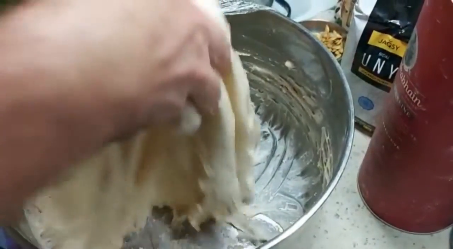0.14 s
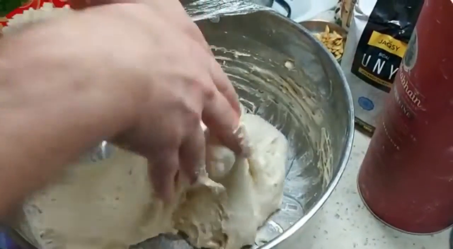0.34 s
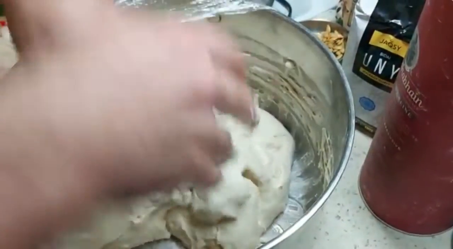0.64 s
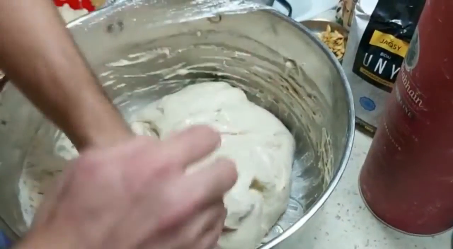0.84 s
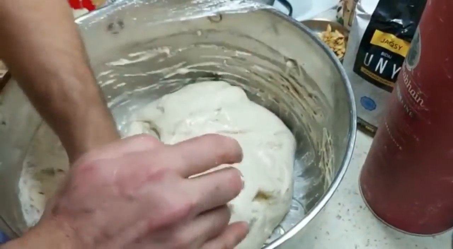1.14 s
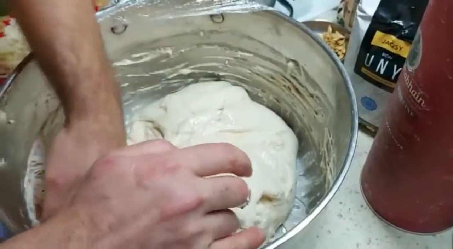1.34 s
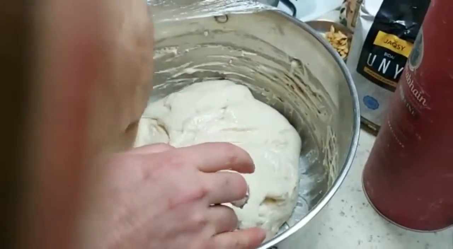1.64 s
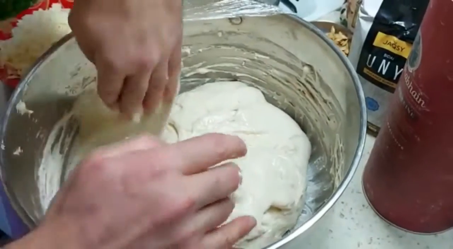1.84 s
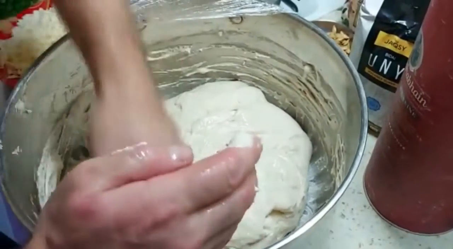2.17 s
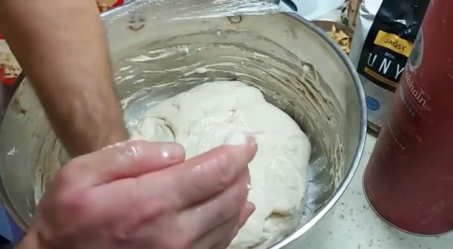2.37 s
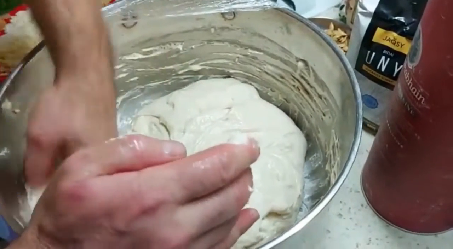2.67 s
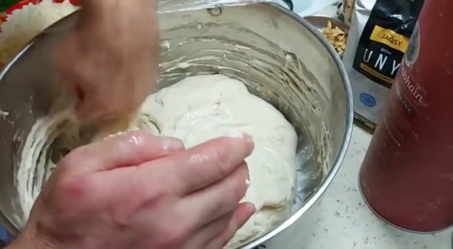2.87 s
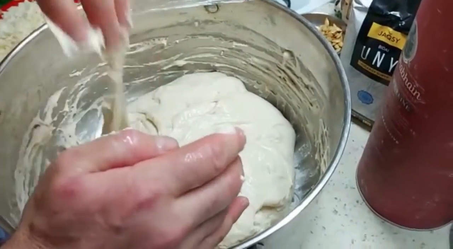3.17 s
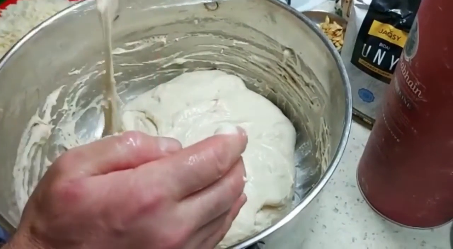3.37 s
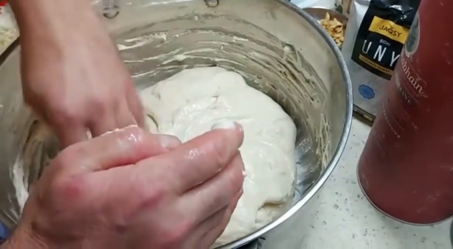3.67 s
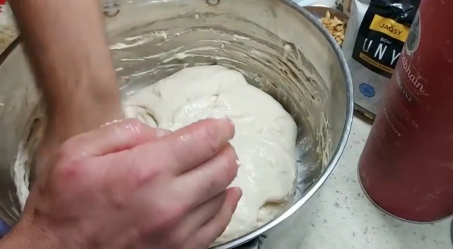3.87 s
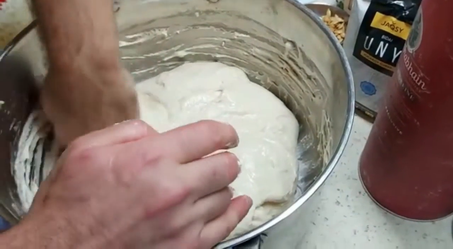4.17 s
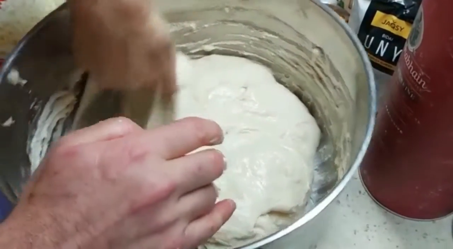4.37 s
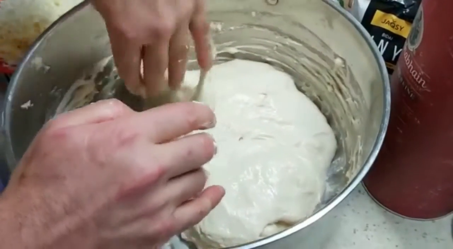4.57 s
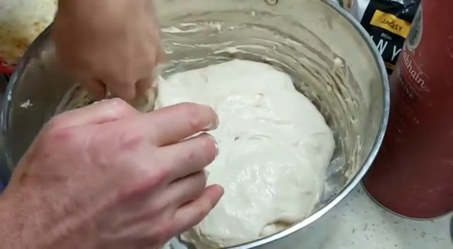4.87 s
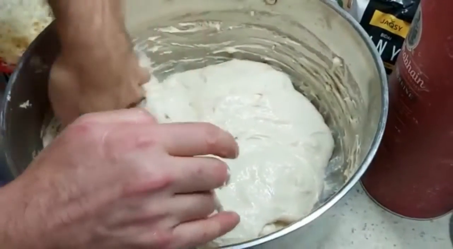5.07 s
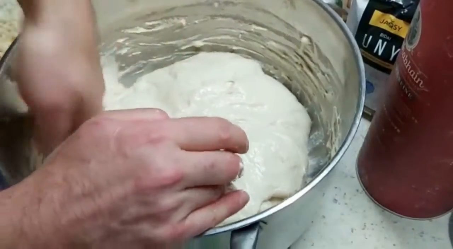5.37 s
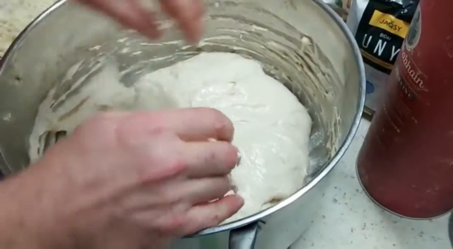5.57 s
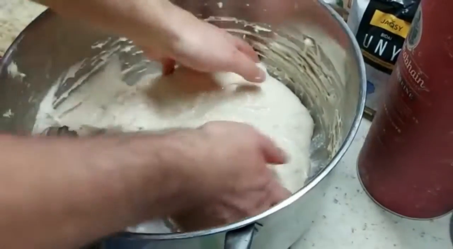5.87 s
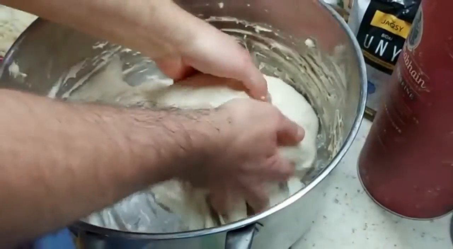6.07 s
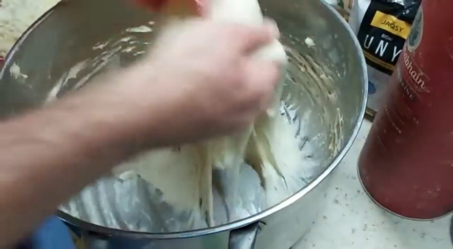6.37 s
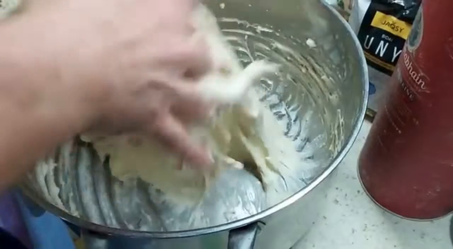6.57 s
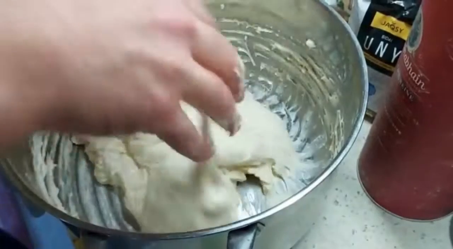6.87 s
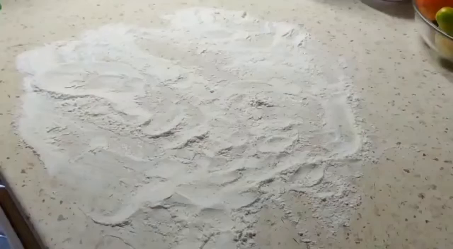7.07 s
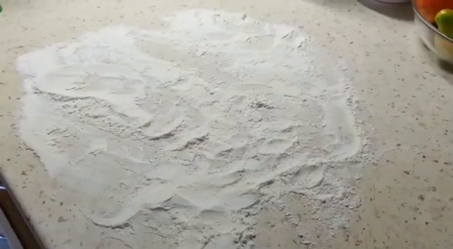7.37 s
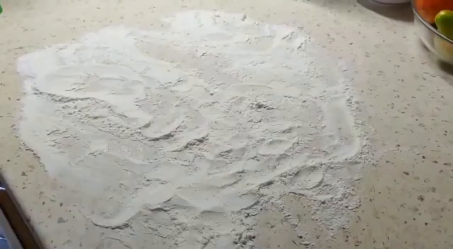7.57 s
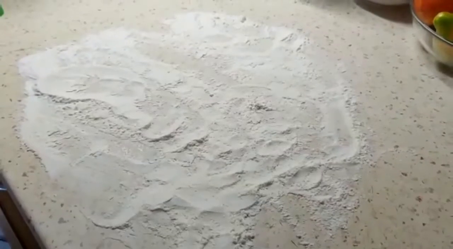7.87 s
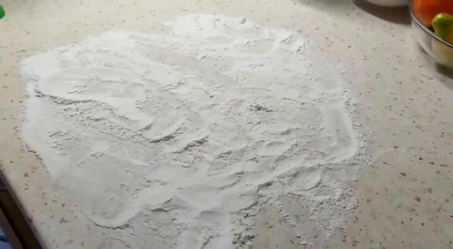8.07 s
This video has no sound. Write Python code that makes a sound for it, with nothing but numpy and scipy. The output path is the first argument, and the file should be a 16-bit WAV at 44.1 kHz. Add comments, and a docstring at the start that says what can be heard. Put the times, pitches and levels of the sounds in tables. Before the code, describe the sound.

Hands work sticky dough in a steel pot, heard very close in a quiet kitchen. Dough peels with fine bright crackles and tiny snaps; a heavy wet slap thumps the pot early and a harder one comes midway. Soft wipes and faint squeaks fill the gaps. A busier run of squelches and dull knocks follows, then only low room hum and a soft bump with a light tap.

```python
"""Hands knead wet, sticky dough in a steel pot on a kitchen counter, close to a phone's two microphone ports.
Noise-driven modes make the dough thump the damped pot; shaped grains smack, squelch, snap and wipe its wall.
Each pull builds up a crackle and lets it go; each wipe swells and fades with the speed of the hand.
Trapped air squeaks as gliding tones and the pressed pot judders low, over rumble and appliance hum.
Near the end the background moves to the counter, where some hums are louder and something bumps softly."""
import sys
import numpy as np
from scipy import signal
from scipy.fft import rfft, irfft
from scipy.io import wavfile
from scipy.ndimage import uniform_filter1d

SR = 44100
rng = np.random.default_rng(int(sys.argv[2]) if len(sys.argv) > 2 else 0)


def master(y):
    """Save y as 16-bit WAV."""
    cut = np.clip(np.atleast_2d(y).T, -1, 1)
    pcm = np.round(cut * 32767)  # scale
    wavfile.write(sys.argv[1], SR, pcm.astype(np.int16))


N = 362502
T = np.arange(N) / SR  # s
HIT_T = T[:SR * 3 // 5]  # s, the span of one hit
MOVE_S = 7.13  # the background passes from pot to counter
TOP_HZ = 15850  # top of the microphone's range
SNAP_T60_S = 0.0057
PULL_RANGE_DB = 20  # climb of the crackle over the build-up, and its fall over the let-go
PORT_LAG_S = 0.0002  # the pot's own ring reaches the left port this much later
BUMP_LAG_S, BUMP_LEFT_DB = 0.00027, -7  # the bump's touch is later at the right port, weaker at the left

# Levels in the event tables are relative: each layer is trimmed again in the mix.
# Pulls that peel dough off skin and steel: (greatest strain t/s, level/dB, build-up/s, let-go/s)
PULLS = [(0.02, -67.5, 0.25, 0.52), (0.36, -59, 0.32, 0.52), (0.68, -53, 0.053, 0.045),
         (1.28, -59.5, 0.58, 0.71), (1.58, -58, 0.091, 0.16), (1.85, -64.5, 0.6, 0.34),
         (2.52, -66.5, 0.69, 0.28), (2.77, -58, .12, 0.43), (3.74, -61.5, 0.15, 0.06),
         (4.08, -67, 0.77, 0.73), (4.34, -58, 0.3, 0.58), (4.59, -53, 0.079, 0.12), (5.29, -63, 0.33, 0.37),
         (5.689, -60.5, 0.059, 0.076), (5.9, -57.5, 0.2, 0.23), (6.14, -51.5, 0.33, .36),
         (6.4, -56, 0.22, 0.33), (6.56, -60, 0.19, 0.087), (6.742, -58, 0.27, 0.27)]
# Loudest strands snapping and sticky ticks: (t/s, level/dB, f/Hz)
SNAPS = [(0.0953, -55.5, 13500), (0.301, -52, 13600), (0.365, -54.5, 13900), (0.499, -54.5, 13800),
         (1.2501, -50.5, 14000), (1.8213, -60, 13500), (1.975, -58.5, 13500), (2.524, -61, 13500),
         (2.7707, -57, 4370), (2.9543, -65, 14200), (3.166, -61, 13500), (3.982, -50, 14600),
         (4.25, -53, 7850), (4.2922, -50, 13400), (4.374, -54.5, 11100), (5.0212, -65.5, 4600),
         (5.2026, -59, 14000), (5.252, -60, 10500), (5.9735, -59, 13000), (6.001, -51, 12900),
         (6.2233, -49, 14400), (6.5505, -52.5, 7000), (6.7403, -56, 12400), (6.967, -50.5, 14000)]
# Air pockets squeezed out of the dough:
# (t/s, burst level/dB, hollow level/dB, spray level/dB, swell time constant/s, pocket f/Hz)
SQUELCHES = [(0.3022, -65, -58.5, -67, 0.0094, 1100), (0.6804, -50, -46, -61, 0.0059, 1110),
             (3.7424, -47.5, -47.5, -51.5, 0.0059, 714), (5.203, -68, -62.5, -77, 0.0096, 750),
             (5.8656, -47.5, -49.5, -74, 0.004, 4070), (6.2612, -63, -43, -63, 0.0034, 605),
             (6.3465, -59.5, -68, -71, 0.0057, 2880), (6.4467, -58.5, -49, -62.5, 0.0029, 566),
             (6.6912, -80, -49.5, -73, 0.009, 1065), (6.7501, -54, -53, -57.5, 0.02, 1730),
             (6.98, -61.5, -64, -73, 0.005, 2030), (7.0333, -69, -64.5, -72, 0.008, 1970)]
# Dough and hands landing in the pot:
# (t/s, thump level/dB, pot wall level/dB, wet smack level/dB, ring length factor)
SLAPS = [(0.321, -42, -55.5, -84, 0.52), (0.681, -37.5, -59, -79, 0.69), (0.757, -46, -69, -85, 0.56),
         (0.983, -19, -23, -31.5, 0.57), (2.414, -45.5, -59.5, -68, 0.82), (3.978, -29, -45, -67, 0.46),
         (4.574, -16.5, -18, -25, 0.49), (4.602, -23, -27, -42, 0.45), (4.645, -24.5, -51, -71, 0.39),
         (5.688, -33.5, -46, -52, 0.62), (5.708, -25.5, -38, -55.5, 0.75),
         (6.029, -24.5, -27.5, -41.5, 0.38), (6.087, -41, -50, -51.5, 0.78),
         (6.251, -33.5, -43.5, -55, 0.78), (6.304, -35.5, -45.5, -60.5, 0.97)]
# The pot judders as the fist leans into it: (t/s, length/s, f/Hz, level/dB)
JUDDERS = [(0.338, 0.2, 85.3, -54), (1.098, 0.098, 109, -46.5), (4.044, 0.19, 113.2, -47.5),
           (5.79, 0.23, 98.6, -51), (6.29, 0.084, 167, -55)]
# Fingers wiping along the pot wall: (fastest slide t/s, level/dB, half length/s)
WIPES = [(1.244, -67, 0.094), (1.37, -65, 0.038), (1.46, -64, 0.035), (1.61, -63.5, 0.099),
         (1.773, -74, 0.18), (2.695, -62, 0.18), (4.079, -69, 0.032), (4.222, -70.5, 0.17),
         (5.313, -68.5, .11), (6.062, -63.5, .09), (6.285, -80, .17)]
# Thin squeaks of air escaping from the dough:
# (t/s, length/s, f/Hz at the top of the arch, droop at the ends 0-1, level/dB)
SQUEAKS = [(3.782, .15, 12000, .12, -86), (3.79, 0.14, 9250, 0.2, -85), (3.901, 0.06, 8700, 0.15, -76.5),
           (4.011, 0.11, 8060, 0.1, -75), (6.96, 0.043, 4000, .1, -72)]
# Loaded pot rocking on the counter: (f/Hz, level/dB, t60/s before the slap's ring length factor)
ROCKING_MODES = [(91.7, -11, 0.99), (101.5, -2, 0.73), (152.4, 15, 0.25), (167.2, -8.5, 1),
                 (231.5, -4.5, 0.5)]
# Dough-damped pot wall: (f/Hz, level/dB, t60/s before the slap's ring length factor)
WALL_MODES = [(296, -57, 0.13), (314.7, -3, 0.47), (350, 8, 0.1), (432, 7, 0.11), (441.3, -22.5, 0.18),
              (588, -2, 0.23), (621, -8.5, 0.1)]
# Air inside the pot: (f/Hz, width/Hz, level/dB)
POT_AIR = [(473, 73, 2), (546, 20, -12), (737.4, 11, 13), (1009, 67, -7), (1550, 430, -12), (1884, 98, -4)]
# Colour of the wet smack of the hardest slap: (f/Hz, level/dB)
SMACK_COLOUR = [(100, 10), (300, -0.5), (600, -2.5), (900, -0.5), (1300, -2), (1600, 0), (2100, 0.5),
                (2800, -3.5), (3500, -6.5), (4600, -14), (5800, -20.5), (9000, -52.5), (15000, -68)]
# Colour of a bursting air pocket: (f/Hz, level/dB)
SQUELCH_COLOUR = [(500, 6), (1300, -8), (2200, 11.5), (3200, 2), (4600, 5), (6000, -4.5), (9000, -11.5),
                  (15000, -7)]
# Colour of parting dough threads: (f/Hz, level/dB)
CRACKLE_COLOUR = [(500, -21), (1500, -8), (3500, -15.5), (6000, -4.5), (9500, -8.5), (11500, -4.5),
                  (12800, 3.5), (15500, 2.5)]
# Colour of wet skin on steel: (f/Hz, level/dB)
WIPE_COLOUR = [(250, -17), (450, -2), (700, -13.5), (1050, 2.5), (1300, -11), (1750, -2), (2250, 4),
               (2700, -2), (3600, -1.5), (4900, -1.5), (6500, -13), (11000, -11)]
# Colour of the room at the pot: (f/Hz, level/dB)
POT_ROOM_COLOUR = [(20, -30), (35, -20.5), (50, -1.5), (70, -10.5), (105, -8.5), (125, 1), (160, -10.5),
                   (205, -11.5), (330, -14.5), (600, -18), (800, -25), (2200, -26), (9000, -41.5),
                   (15000, -48)]
# Colour of the room at the counter: (f/Hz, level/dB)
COUNTER_ROOM_COLOUR = [(20, -7), (40, -4.5), (52, 2.5), (75, -15.5), (130, -13.5), (195, -8.5), (260, -13),
                       (340, -18), (520, -27.5), (1000, -29.5), (2000, -31.5), (6000, -39.5),
                       (10000, -42.5), (15000, -41)]
# Steady appliance tones: (f/Hz, level/dB at the pot, level/dB at the counter)
HUM = [(45.6, -63.5, -56.5), (157.4, -67, -69.5), (176.5, -73.5, -83), (235, -72.5, -81), (302, -75, -65.5),
       (722, -84, -85.5)]
# Narrow bands of appliance hiss:
# (f/Hz, width/Hz of one filter pass, level/dB at the pot, level/dB at the counter)
WHINE = [(1732, 140, -83.5, -84), (1891, 115, -77.5, -90), (2477, 84, -92, -81.5), (2847, 66, -83, -89),
         (4120, 710, -82.5, -89.5), (5680, 280, -104, -87.5), (7180, 1200, -87, -86)]
# Shading of the left port by the phone's body: (f/Hz, level/dB)
LEFT_SHADE = [(100, -1.5), (300, 0.8), (600, -1.5), (1200, -6.5), (4000, -5.5), (8000, -4.5), (13000, -9)]


def undb(db):
    """Decibels to gain."""
    return 10 ** (np.asarray(db) / 20)


def unit(x):
    """Scale to rms 1."""
    return x / np.sqrt(np.mean(x ** 2))


def crest(x, size=220):
    """Scale so that the loudest run of size samples has rms 1."""
    return x / np.sqrt(uniform_filter1d(x ** 2, size).max())


def colour(x, points):
    """Causal filter with the (f/Hz, level/dB) response, built from its cepstrum."""
    hz, db = np.transpose(points)
    size = 4096
    bins = np.maximum(np.fft.rfftfreq(size, 1 / SR), 1)
    response_db = np.interp(np.log(bins), np.log(hz), db)
    cepstrum = irfft(np.log(undb(response_db)))
    # folding the cepstrum forward gives minimum phase
    cepstrum[1:size // 2] *= 2
    cepstrum[size // 2 + 1:] = 0
    impulse = irfft(np.exp(rfft(cepstrum)))
    return signal.oaconvolve(x, impulse)[:len(x)]


def band(x, hz, width):
    """One resonance, gain 1 at its centre."""
    hz = min(hz, TOP_HZ)
    b, a = signal.iirpeak(hz, hz / min(width, TOP_HZ), fs=SR)
    return signal.lfilter(b, a, x)


def double_band(x, hz, width):
    """The same resonance passed twice, for steeper skirts."""
    return band(band(x, hz, width), hz, width)


def fade(t, t60):
    """Exponential decay, 60 dB down after t60."""
    return np.exp(-np.log(1000) * t / t60)


def grains(count, spread_db):
    """Dense clicks of very unequal size, rms 1."""
    sizes = undb(spread_db * rng.standard_normal(count))
    return unit(rng.standard_normal(count) * sizes)


def walk(rate):
    """Random drift with a spread near 1, through rate new values a second."""
    knots = rng.standard_normal(4096)
    return np.interp(T * rate, np.arange(len(knots)), knots)


def add(track, s, sound):
    """Mix a sound in from time s."""
    start = int(np.clip(s * SR, 0, N - 1))
    track[start:start + len(sound)] += sound[:N - start]


def later(x, s):
    """Delay by s seconds."""
    out = np.zeros(N)
    add(out, s, x)
    return out


def space(x, wet_db):
    """Direct sound, quick reflections inside the pot and a short kitchen tail, different at each port."""
    pot_t60, low_t60, high_t60, room_db = 0.014, 0.22, 0.19, -14  # s, s, s, dB
    split_hz, shortest_hz = 1500, 450
    t, ports = HIT_T, []
    for noise in rng.standard_normal((2, len(t))):
        low = signal.lfilter(*signal.butter(1, split_hz, fs=SR), noise)
        room = low * fade(t, low_t60) + (noise - low) * fade(t, high_t60)
        echo = noise * fade(t, pot_t60) + undb(room_db) * room
        echo = echo * (t > 0.0007)  # gap before the first reflection, s
        # long waves bend round the pot
        echo = signal.lfilter(*signal.butter(2, shortest_hz, "high", fs=SR), echo)
        reflected = signal.oaconvolve(x, echo / np.linalg.norm(echo))[:N]
        ports.append(x + undb(wet_db) * reflected)
    return np.array(ports) / np.sqrt(1 + undb(2 * wet_db))


def arch(length, hz, droop, wobble):
    """A brief unsteady tone that swells, peaks in pitch and dies away."""
    u = np.linspace(-1, 1, int(max(length, 0.01) * SR))
    pitch = hz * (1 - droop * u ** 2 + wobble * walk(rate=104.0)[:len(u)])
    tone = np.sin(2 * np.pi * np.cumsum(pitch) / SR)
    return np.sqrt(2) * (1 - u ** 2) * tone


def shifting(x, depth_db, rate, count=14):
    """Small wet cavities open and close, each lifting its own pitch for a moment."""
    total = 0
    for hz in np.geomspace(400, 9000, count):
        cavity = double_band(x, hz, hz / 4)
        total = total + np.sqrt(1000 / hz) * cavity * undb(depth_db * walk(rate))
    return unit(total)


def pot_air(x):
    """The air inside the pot resonates at its own pitches."""
    return sum(undb(db) * band(x, hz, width) for hz, width, db in POT_AIR)


def background():
    """Room rumble and a running appliance, heard first from the pot and then from the counter."""
    pot_db, counter_db, left_db = -62, -59, -4
    apart_hz = 900
    moved = np.clip((T - MOVE_S) / 0.02, 0, 1)
    common, left, right = rng.standard_normal((3, N))
    low = signal.butter(2, apart_hz, "low", fs=SR)
    high = signal.butter(2, apart_hz, "high", fs=SR)
    hum = 0
    for hz, at_pot, at_counter in HUM:
        level = np.sqrt(2) * undb(at_pot + (at_counter - at_pot) * moved)
        waver = 1 + 0.092 * walk(rate=7.9)
        phase = 2 * np.pi * hz * T + 0.5 * walk(rate=8.4)
        hum = hum + level * waver * np.sin(phase)
    ports = []
    for own in (undb(left_db) * left, right):
        # long waves reach both ports nearly alike
        air = signal.lfilter(*low, common + 0.69 * own) + signal.lfilter(*high, own)
        pot_room = undb(pot_db) * (1 - moved) * unit(colour(air, POT_ROOM_COLOUR))
        counter_room = undb(counter_db) * moved * unit(colour(air, COUNTER_ROOM_COLOUR))
        whine = 0
        for hz, width, at_pot, at_counter in WHINE:
            level_db = at_pot + (at_counter - at_pot) * moved + 2 * walk(rate=7.4)
            whine = whine + undb(level_db) * unit(double_band(own, hz, width))
        # the hiss is weaker at the left port
        ports.append(hum + pot_room + counter_room + whine * own.std())
    return np.array(ports)


def pull(s, db, build, release):
    """Crackle grows with the strain on the dough and dies away once it gives."""
    before = (s - T) / max(build, 0.01)
    after = (T - s) / max(release, 0.01)
    return undb(db - PULL_RANGE_DB * np.maximum(before, after))


def peeling():
    """Countless tiny threads let go in flurries, and some pop in wet hollows."""
    peel_db, pops_db = -1.25, -12.0
    clicks = grains(N, spread_db=8) * undb(4.5 * walk(rate=130))
    pops = shifting(grains(N, spread_db=11), depth_db=4, rate=45)
    strain = np.sqrt(sum(pull(*row) ** 2 for row in PULLS))
    crackle = unit(colour(clicks, CRACKLE_COLOUR)) + undb(pops_db) * pops
    return undb(peel_db) * strain * crackle


def snaps():
    """A strand parts with a sharp tick around its own pitch, and its ends patter back."""
    snap_db, click_db = 4, -14
    tail_db, tail_t60 = -24, 0.14  # dB, s
    breadth = 0.49  # band width as a share of the pitch
    out, t = np.zeros(N), T[:SR // 8]
    for s, level, hz in SNAPS:
        shape = fade(t, SNAP_T60_S) + undb(tail_db) * fade(t, tail_t60)
        tick = grains(len(t), spread_db=4) * shape
        pitched = double_band(tick, hz, breadth * hz)
        add(out, s, undb(level + snap_db) * crest(pitched + undb(click_db) * tick, size=64))
    return out


def squelches():
    """A pocket swells open, bursts in a fine spray, and sounds its own hollow and the air in the pot."""
    burst_db, hollow_db, spray_db, swell_db, pocket_db = -2, -3, -2, -5, 2
    close_t60 = 0.043  # s
    pocket_breadth = 0.083  # band width as a share of the pocket's pitch
    spray_hz, spray_width_hz = 7800, 10000
    out, t = np.zeros(N), HIT_T - 0.06  # the burst is at t = 0
    for s, burst_level, hollow_level, spray_level, swell, pocket in SQUELCHES:
        opening = undb(swell_db) * np.exp(-abs(t) / max(swell, 0.001))
        shape = np.where(t < 0, opening, fade(abs(t), close_t60))
        puff = shape * grains(len(t), spread_db=6)
        pot = colour(pot_air(puff), [(150, -19), (450, 6.5), (1800, 6), (5000, -9.5)])
        own_hollow = band(puff, pocket, pocket_breadth * pocket)
        hollow = crest(pot) + undb(pocket_db) * crest(own_hollow)
        mist = double_band(puff, spray_hz, spray_width_hz)
        sound = undb(burst_level + burst_db) * crest(colour(puff, SQUELCH_COLOUR))
        sound += undb(hollow_level + hollow_db) * crest(hollow)
        sound += undb(spray_level + spray_db) * crest(mist)
        add(out, s + t[0], sound)
    return out


def ring(force, modes, hold, detune):
    """Modes driven by a force; the dough lies differently each time, shifting and damping them."""
    response = 0
    for hz, db, t60 in modes:
        shifted_hz = hz * (1 + detune * rng.standard_normal())
        tone = np.cos(2 * np.pi * shifted_hz * HIT_T)
        response = response + undb(db) * fade(HIT_T, t60 * hold) * tone
    return crest(signal.fftconvolve(force, response)[:len(HIT_T)])


def slaps():
    """Air rushes from the closing gap, the wet face smacks, the settling lump shakes the pot: body, wet."""
    wall_db, smack_db = 1, 1
    settle, settle_t60 = 0.021, 0.27  # share of the impact, s
    rush_db, rush_s = -16, 0.0097  # dB, time constant in s
    smack_t60, patter_db, patter_t60 = 0.023, -13.0, 0.21  # s, dB, s
    crack_db, crack_hz, crack_width_hz = -20, 5200, 6500
    db_per_octave = 75  # softer slaps shift their colour down
    body, wet, t = np.zeros(N), np.zeros(N), HIT_T
    lead = T[:SR // 25]
    hardest = max(row[3] for row in SLAPS)
    for s, thump, wall, smack, hold in SLAPS:
        force = settle * rng.standard_normal(len(t)) * fade(t, settle_t60)
        force[0] += 1
        # the soft mass lands slowly and drives only the low modes
        push = colour(force, [(25, -26.5), (75, 7.5), (200, -1.5), (600, -13), (2000, -50)])
        shake = colour(force, [(60, -30.0), (280, 5), (700, 2), (1500, -28), (5000, -83)])
        rocking = undb(thump) * ring(push, ROCKING_MODES, hold, detune=0.023)
        walls = undb(wall + wall_db) * ring(shake, WALL_MODES, hold, detune=0.026)
        add(body, s, rocking + walls)
        rush = undb(rush_db) * np.exp(-lead[::-1] / rush_s)
        landing = fade(t, smack_t60) + undb(patter_db) * fade(t, patter_t60)
        shape = np.r_[rush, landing]
        spatter = shape * grains(len(shape), spread_db=4)
        # softer slaps are darker and lose their crack
        softer = smack - hardest
        darker = [(hz * 2 ** (softer / db_per_octave), db) for hz, db in SMACK_COLOUR]
        splat = crest(colour(spatter, darker))
        crack = crest(double_band(spatter, crack_hz, crack_width_hz))
        face = splat + undb(crack_db + 2 * softer) * crack
        add(wet, s - lead[-1], undb(smack + smack_db) * face)
    return body, wet


def judders():
    """The pressed pot sticks and slips on the counter with a low groan of wobbling pitch."""
    out = np.zeros(N)
    for s, length, hz, db in JUDDERS:
        add(out, s, undb(db) * arch(length, hz, droop=0.0054, wobble=0.23))
    return out


def stroke(s, db, half):
    """A hand speeds up and slows again: a bell-shaped swell."""
    return undb(db) * np.exp(-((T - s) / max(half, 0.005)) ** 2)


def wiping():
    """Wet skin slides over smeared steel in fine slips, gripping unevenly; once it nearly squeaks."""
    grip_db, hollow_db, shifting_db = 3, -5, -5
    squeak_s, squeak_half_s, squeak_hz, squeak_db = 2.70, 0.017, 2250, -55
    slips = grains(N, spread_db=7.5) * undb(grip_db * walk(rate=97))
    pockets = shifting(grains(N, spread_db=7), depth_db=3, rate=40)
    rub = unit(colour(slips, WIPE_COLOUR))
    rub += undb(hollow_db) * unit(pot_air(slips))
    rub += undb(shifting_db) * unit(colour(pockets, WIPE_COLOUR))
    squeak_swell = 1 / (1 + ((T - squeak_s) / squeak_half_s) ** 2)
    squeak = unit(double_band(slips, squeak_hz, 220)) * squeak_swell
    slide = np.sqrt(sum(stroke(*row) ** 2 for row in WIPES))
    return rub * slide + undb(squeak_db) * squeak


def squeaks():
    """Trapped air whistles out through pinholes in the wet dough."""
    out = np.zeros(N)
    for s, length, hz, droop, db in SQUEAKS:
        add(out, s, undb(db) * arch(length, hz, droop, wobble=0.004))
    return out


def bump():
    """Something brushes the counter, bumps it softly and lands with a light tap; left and right port."""
    brush_s, brush_db, brush_t60 = 8.1316, -52, 0.18
    thud_s, thud_hz, thud_db, thud_t60 = 8.158, 62, -36, 0.13
    tap_s, tap_db, tap_t60 = 8.1765, -30, 0.009
    rattle_db, rattle_t60 = -17, 0.14
    brush_colour = [(300, 0), (1500, 1), (4000, -10.5), (8000, -4.5), (15000, -19)]
    tap_colour = [(100, -6), (600, -3.5), (1200, 3.5), (1800, 6),
                  (2600, -8.5), (4000, -22), (8000, -29), (15000, -43)]
    thud, touch, t = np.zeros(N), np.zeros(N), HIT_T
    add(thud, thud_s, undb(thud_db) * np.sin(2 * np.pi * thud_hz * t) * fade(t, thud_t60))
    brush = grains(len(t), spread_db=7) * fade(t, brush_t60)
    add(touch, brush_s, undb(brush_db) * crest(colour(brush, brush_colour)))
    shape = fade(t, tap_t60) + undb(rattle_db) * fade(t, rattle_t60)
    contact = rng.standard_normal(len(t)) * shape
    add(touch, tap_s, undb(tap_db) * crest(colour(contact, tap_colour), size=100))
    left, right = space(touch, wet_db=-16)
    return thud + np.array([undb(BUMP_LEFT_DB) * left, later(right, BUMP_LAG_S)])


def scene():
    """The right port faces the pot; for the pot's sounds the left one is shaded, most in the treble."""
    body, wet = slaps()
    bright = space(wet + squelches() + wiping(), wet_db=-0.5)
    bright += space(peeling() + snaps() + squeaks(), wet_db=1)
    far, near = space(body + judders(), wet_db=-6.5)
    left, right = np.array([later(far, PORT_LAG_S), near]) + undb(5.5) * bright
    pot = np.array([colour(left, LEFT_SHADE), right])
    return pot + bump() + background()


def record(dry):
    """The phone's microphone cuts the top with a steep low-pass."""
    low_pass = signal.ellip(10, 0.2, 70, TOP_HZ, fs=SR, output="sos")
    return signal.sosfilt(low_pass, dry)


dry = scene()
out = record(dry)
master(out)
```